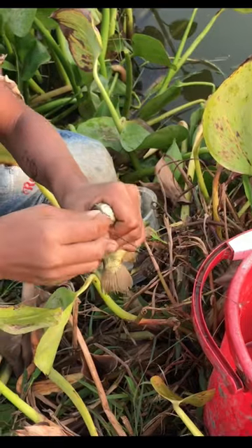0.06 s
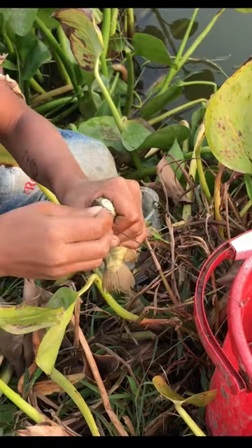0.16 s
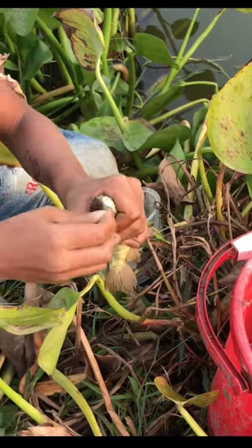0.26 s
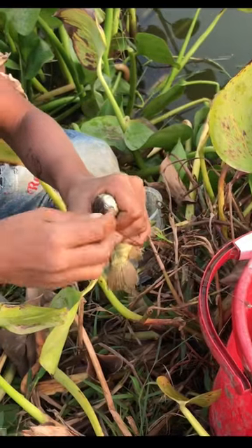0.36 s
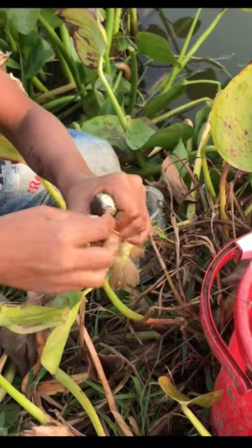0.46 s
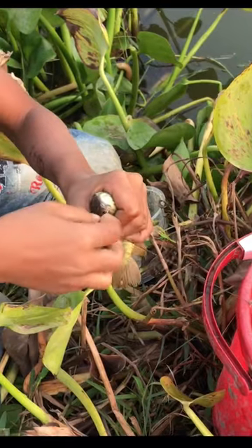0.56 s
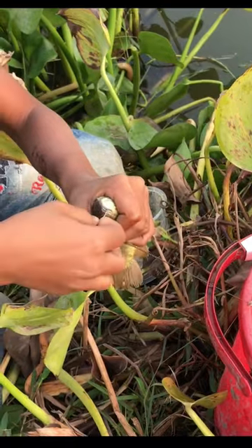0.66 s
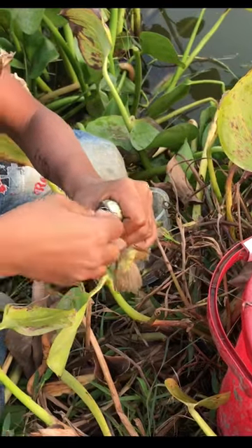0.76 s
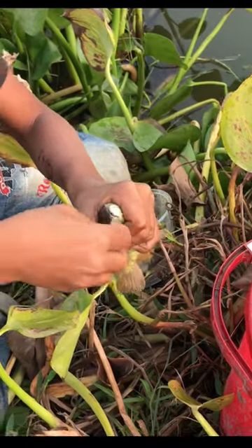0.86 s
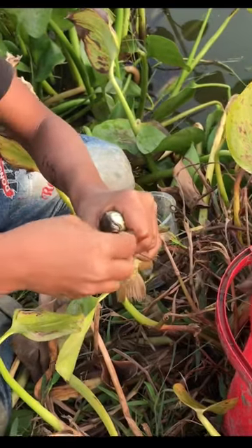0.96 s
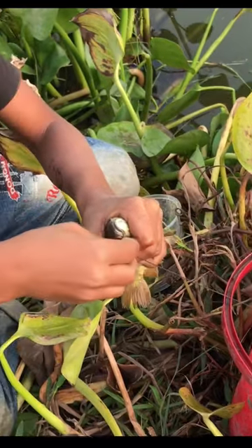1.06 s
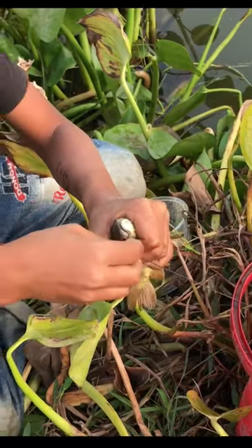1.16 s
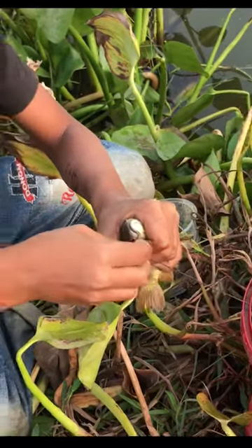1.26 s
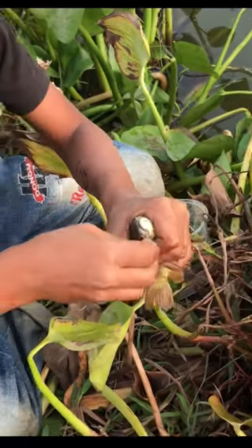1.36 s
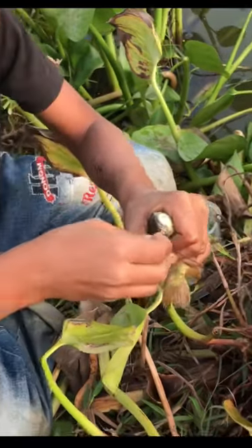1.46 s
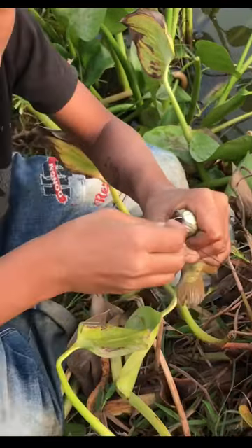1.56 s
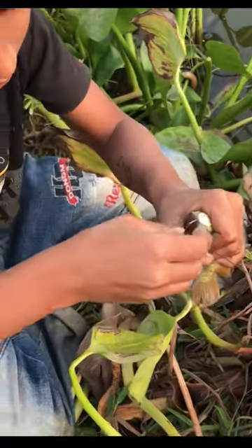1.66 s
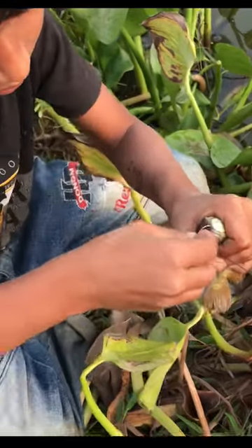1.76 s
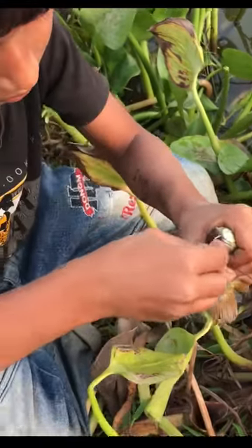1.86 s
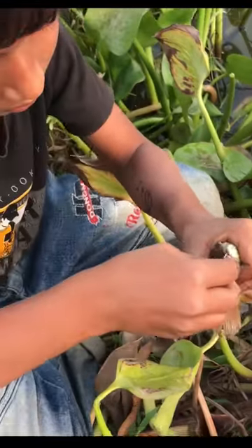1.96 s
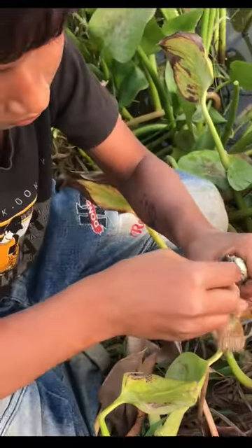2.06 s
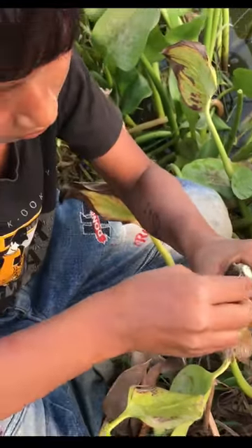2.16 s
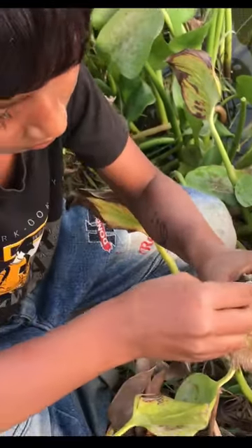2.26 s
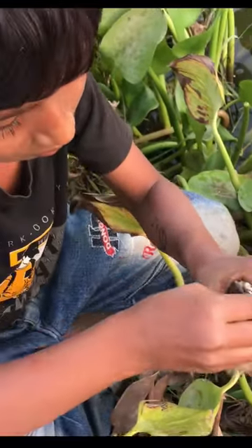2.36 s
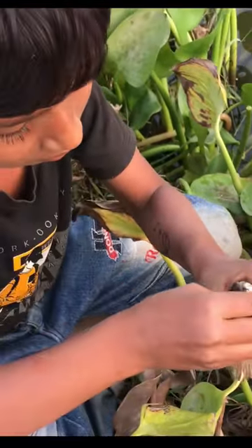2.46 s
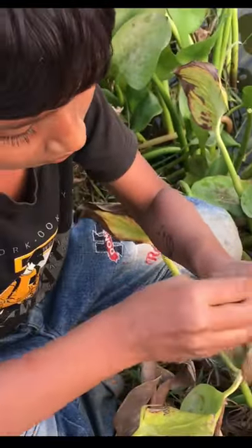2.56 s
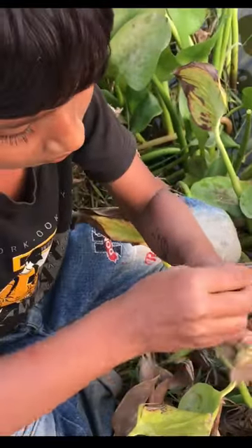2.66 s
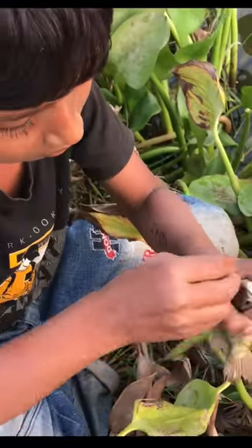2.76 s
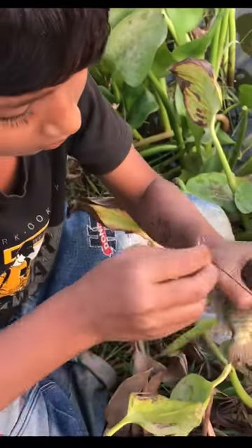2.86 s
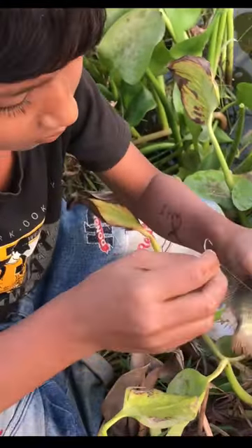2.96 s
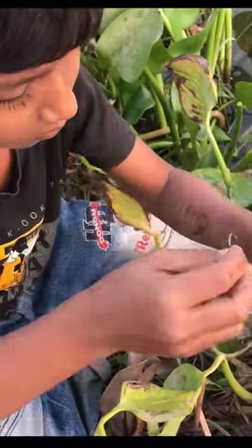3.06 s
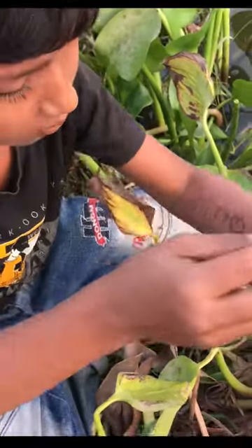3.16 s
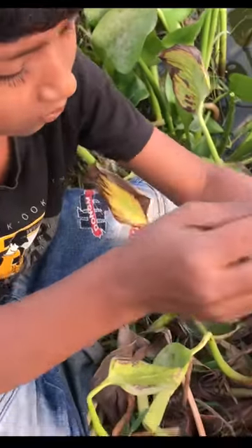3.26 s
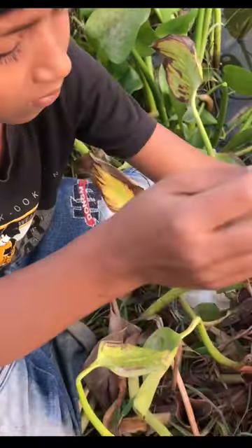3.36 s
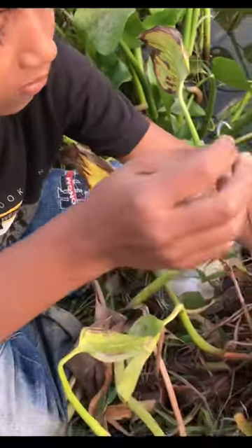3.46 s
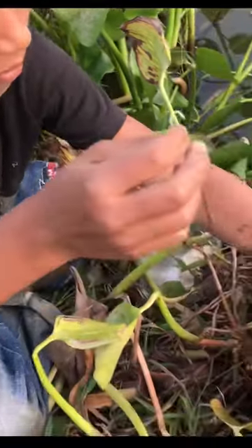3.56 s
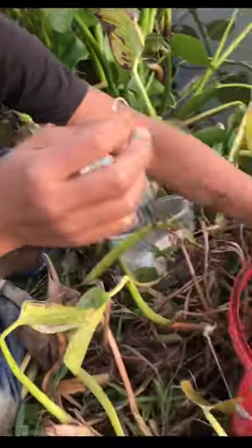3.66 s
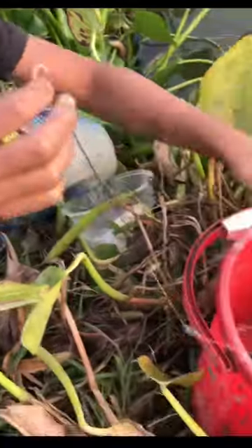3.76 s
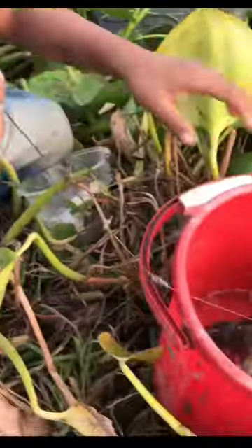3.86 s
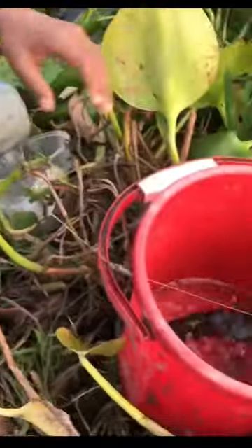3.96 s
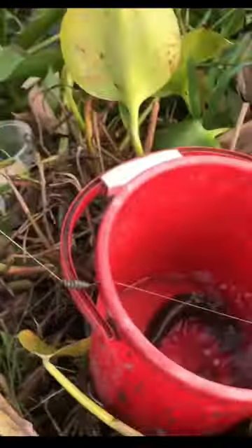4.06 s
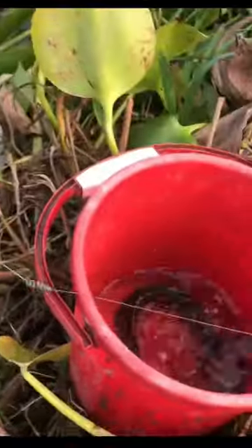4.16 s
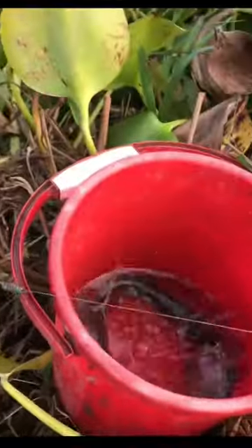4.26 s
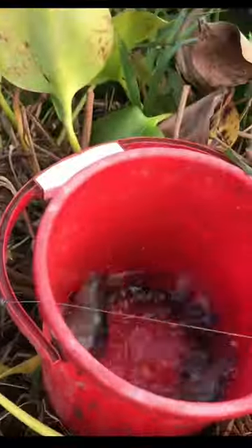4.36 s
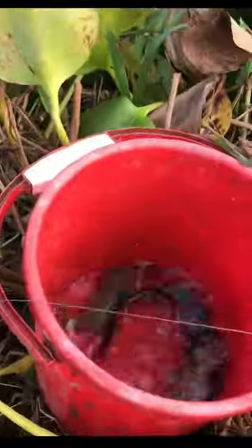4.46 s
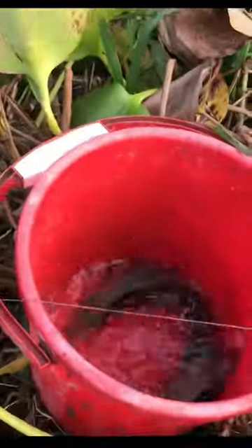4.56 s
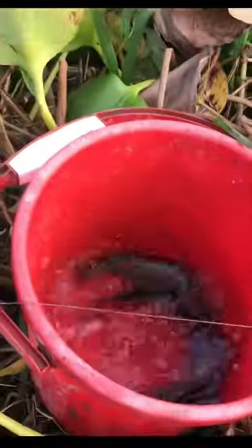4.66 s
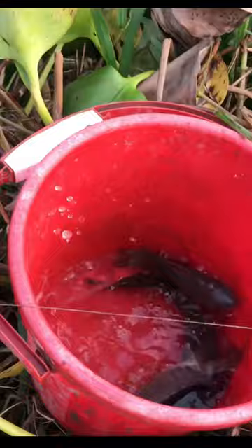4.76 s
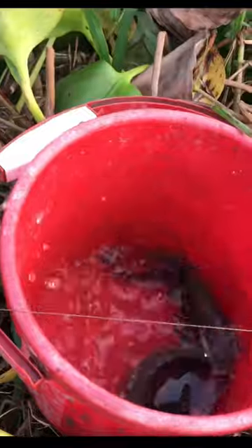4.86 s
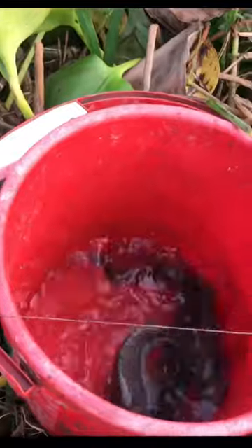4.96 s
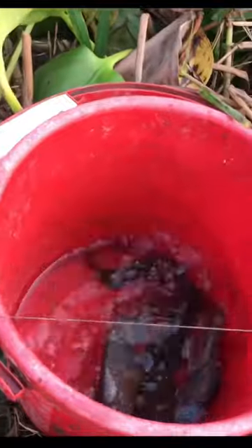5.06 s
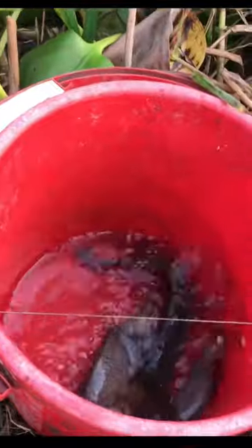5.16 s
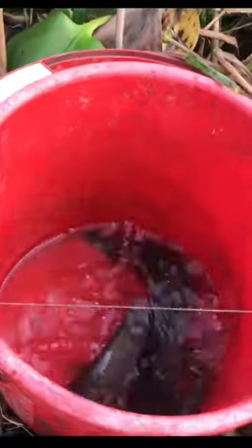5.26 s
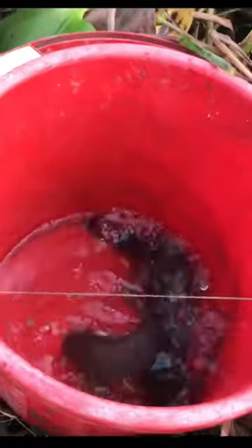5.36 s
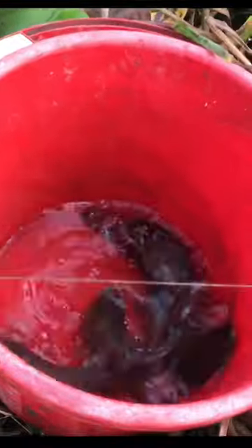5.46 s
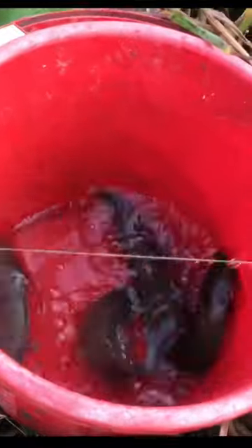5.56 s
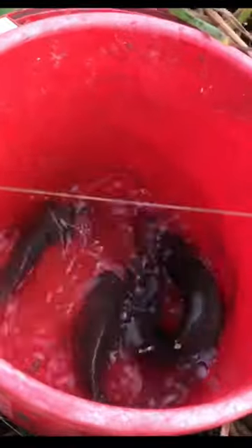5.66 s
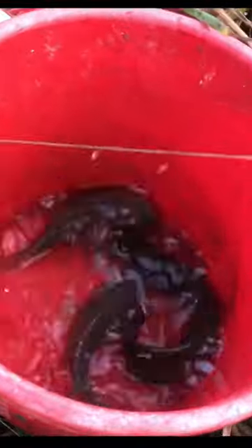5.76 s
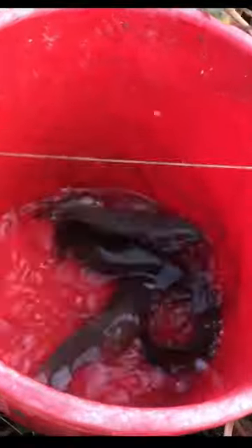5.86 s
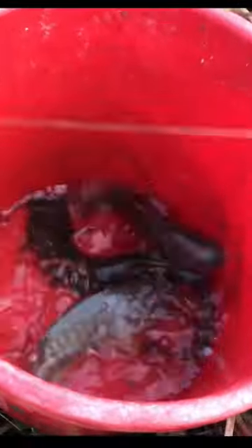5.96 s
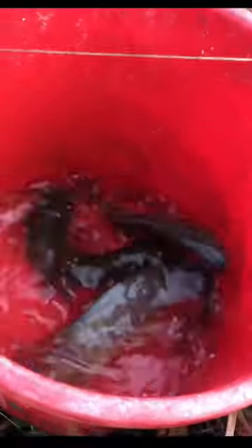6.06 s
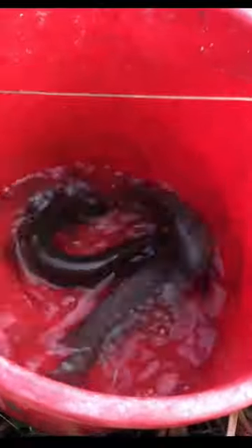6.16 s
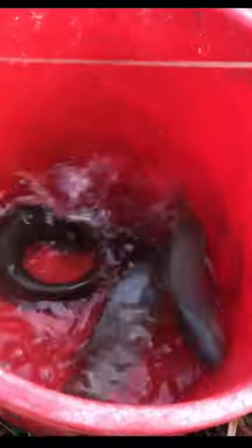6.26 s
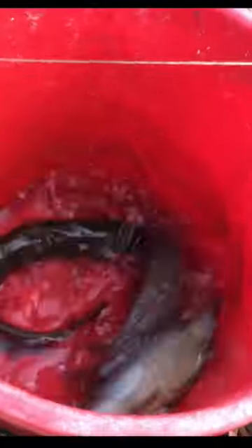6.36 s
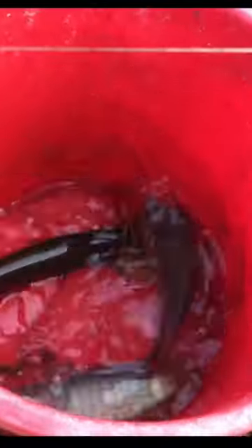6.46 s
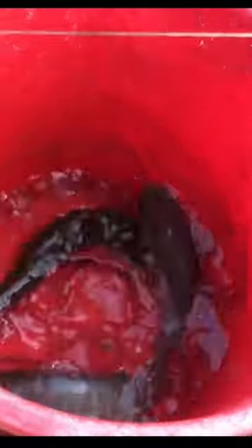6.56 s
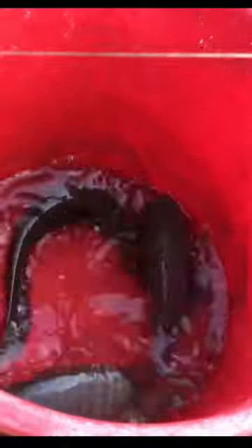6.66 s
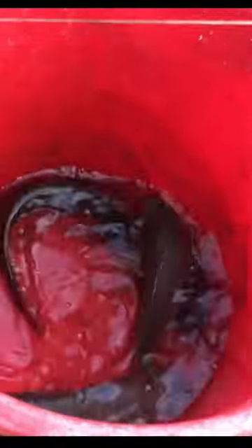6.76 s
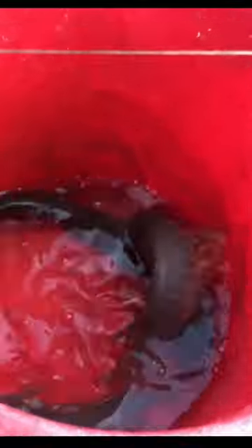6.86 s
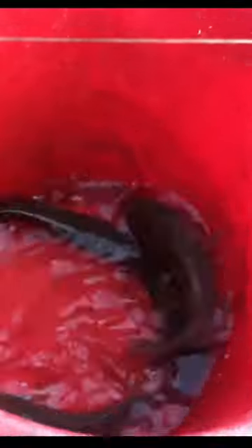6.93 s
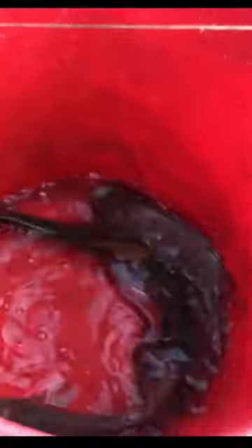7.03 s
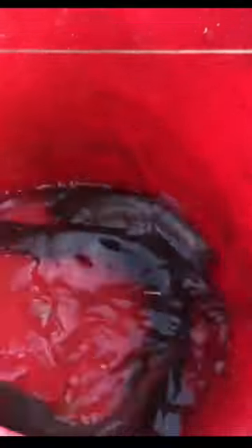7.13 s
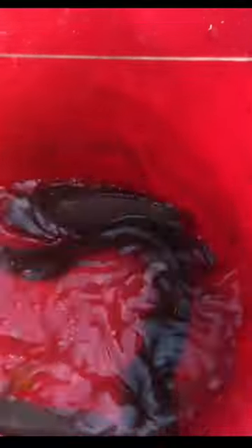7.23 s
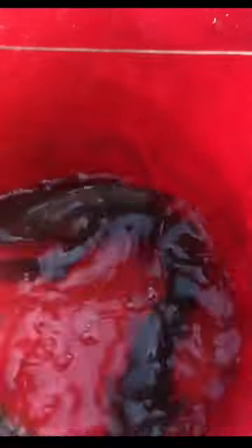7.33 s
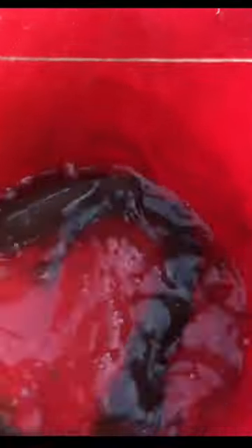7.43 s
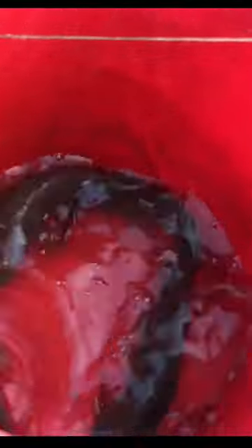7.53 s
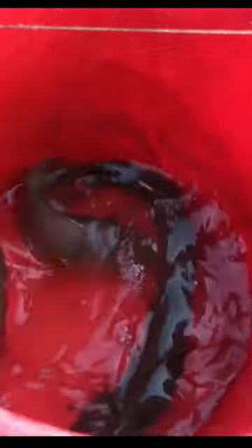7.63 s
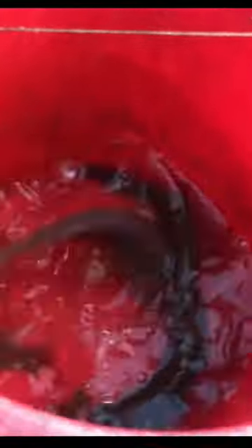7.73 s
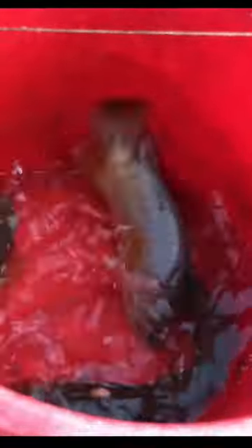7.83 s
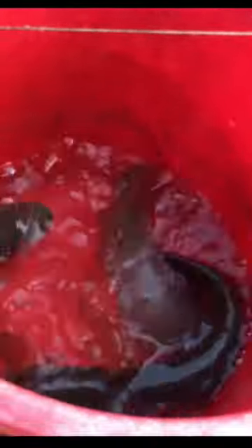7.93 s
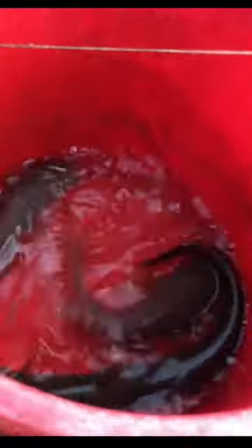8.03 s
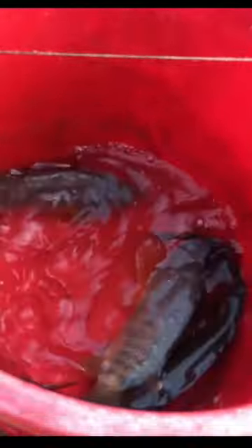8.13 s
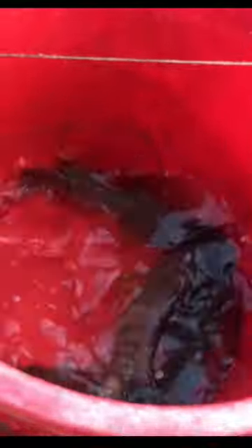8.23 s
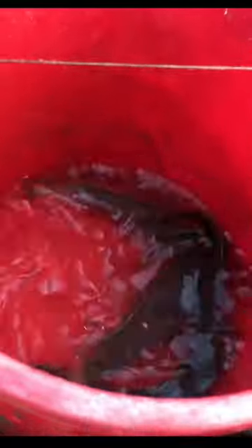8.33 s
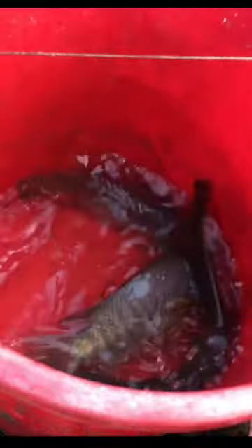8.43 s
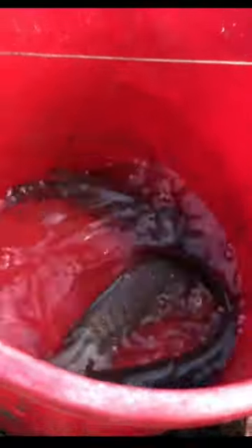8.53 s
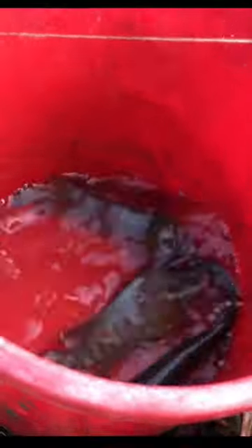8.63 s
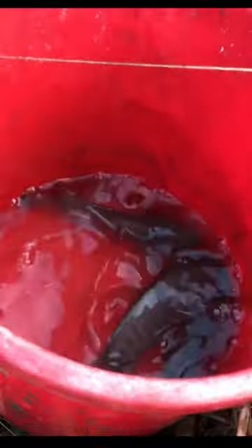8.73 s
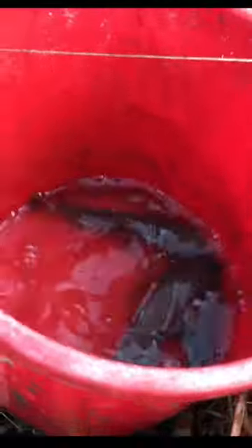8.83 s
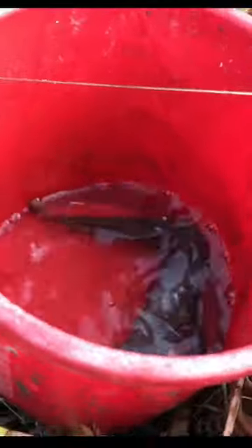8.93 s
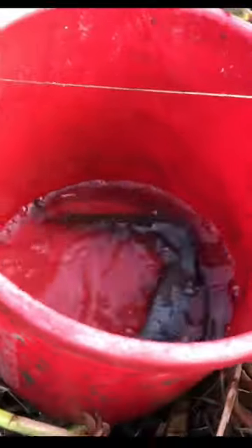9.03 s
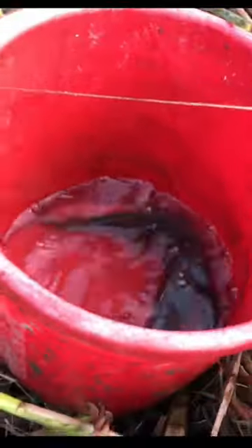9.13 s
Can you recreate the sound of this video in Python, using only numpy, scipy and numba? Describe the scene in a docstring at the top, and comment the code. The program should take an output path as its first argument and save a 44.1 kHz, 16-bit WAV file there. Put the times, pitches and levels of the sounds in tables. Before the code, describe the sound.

Dry clicks and faint rustling, then wet slaps and thrashing splashes in a plastic bucket while a distant engine drones outdoors.

```python
"""Clicks and dry rustling as the catch is handled, then tails slap and thrash in a shallow plastic bucket.
By the pond, far off, an engine gains speed, shifts gear and pulls again over a quiet floor, heard by a phone.
Clicks and slaps are shaped bursts of noise with a ringing tone; spray and droplets are short damped sines.
Large bubbles are gliding sines, and resonant filters make the air in the bucket ring.
The engine is a stack of sines at multiples of its firing rate; the open air is filtered noise."""
import sys
import numpy as np
from scipy import signal
from scipy.fft import rfft, irfft
from scipy.io import wavfile
from scipy.ndimage import uniform_filter1d
from numba import njit

SR = 44100
rng = np.random.default_rng(int(sys.argv[2]) if len(sys.argv) > 2 else 0)


def generate_wav(signal):
    """Clip the signal to [-1, 1] and save it as 16-bit WAV at the path in sys.argv[1]."""
    frames = np.transpose(np.atleast_2d(signal))
    scaled = np.clip(frames, -1, 1) * 32767
    pcm = np.round(scaled).astype(np.int16)
    wavfile.write(sys.argv[1], SR, pcm)


N = 405262  # length in samples

# Colour of the open air. Each row: frequency in Hz, relative level in dB per Hz.
AIR_COLOUR = [(15, -35.5), (25, 1.5), (59, -2.5), (92, -3.5), (270, -17), (394, -27), (451, -28.5),
              (1100, -34.5), (1290, -38.5), (1650, -34), (5000, -39), (9320, -43.5), (10400, -44.5),
              (12200, -35.5), (16000, -48.5)]
# Tyre and exhaust hiss of the road. Each row: time in seconds, level in dB.
ROAD_LEVEL = [(0, -58.5), (1.9, -64), (3.6, -69), (7.001, -70), (9.19, -72.5)]
# Faint far-off calls. Each row: start in seconds, length in seconds, start, middle and end pitch in Hz,
# level in dB.
FAR_CALLS = [(0.27, 0.13, 1487, 1460, 1440, -64), (2.1, .3, 1440, 1490, 1480, -77),
             (1.685, 0.2, 1050, 1125, 1024, -58), (2.127, .09, 706, 727, 725, -62),
             (2.523, 0.072, 745, 730, 740, -65), (3.56, 0.25, 596, 614, 610, -58)]
# The engine in each gear. Each row: time in seconds, firing rate in Hz, level in dB.
FIRST_GEAR = [(0.0, 25.67, -34.5), (0.18, 25.7, -37), (2.26, 27.06, -43.5), (4.6, 28.64, -47),
              (6.38, 29.66, -47), (6.97, 29.9, -50.5), (7.25, 27.6, -74)]
SECOND_GEAR = [(8.1, 21.79, -45), (8.648, 30.62, -39.5), (9.19, 34.17, -42.5)]
# Tones that make up one engine thump. Each row: multiple of the firing rate, relative level in dB.
FIRST_GEAR_ORDERS = [(1, -34.5), (2, -8), (3, -27), (4, -6), (5, 0.5), (6, -10), (7, -12), (8, -18),
                     (9, -19), (10, -24), (11, -25), (12, -33)]
SECOND_GEAR_ORDERS = [(1, -30), (2, -1), (3, -4.5), (4, -15.5), (5, -21.5), (6, -25)]
# Dull knocks nearby. Each row: start in seconds, level in dB, pitch in Hz.
KNOCKS = [(1.185, -16.5, 384), (2.117, -23, 274), (2.247, -22.5, 794)]
# Open-air noise ringing in the bucket. Each row: time in seconds, level in dB.
MURMUR_LEVEL = [(0, -86), (4, -98), (5.998, -101.5), (9.19, -64)]
# Faint treble fizz. Each row: time in seconds, level in dB.
FIZZ_LEVEL = [(0, -108), (3.6, -75), (9.19, -70.5)]
# Dry rustling while the catch is handled. Each row: start in seconds, length in seconds, level in dB.
RUSTLES = [(2.861, .09, -52), (2.965, 0.022, -56), (3.06, 0.17, -54.5), (3.242, 0.046, -71),
           (3.455, 0.071, -62)]
# Bodies bumping the wall and floor of the bucket. Each row: start in seconds, relative level in dB.
THUMPS = [(3.667, -35.5), (3.712, -35.5), (3.893, -47), (3.981, -33.5), (4.047, -32), (4.254, -28.5),
          (4.323, -34), (4.427, -31), (4.578, -36), (4.715, -37), (4.788, -39.5), (4.901, -39),
          (5.005, -32), (5.062, -41), (5.239, -29.5), (5.306, -32), (5.519, -31), (5.677, -33),
          (5.759, -34), (6.218, -44), (6.313, -26), (6.395, -49), (6.597, -36), (6.836, -37),
          (6.929, -43.5), (7.084, -33.5), (7.393, -38.5), (7.595, -46), (7.654, -25), (7.767, -39),
          (7.901, -55), (8.06, -33), (8.151, -53), (8.247, -35.5)]
# Churning water. Each row: time in seconds, relative level in dB.
CHURN_LEVEL = [(2.75, -86), (2.93, -84), (3.05, -81), (3.27, -66.5), (3.52, -84), (3.72, -48), (3.84, -45),
               (4.2, -51), (4.6, -37), (4.71, -37), (4.85, -50), (5.06, -54.5), (5.4, -48.5), (5.67, -43),
               (5.82, -48), (6.1, -60), (6.25, -46), (6.75, -61), (7.45, -61.5), (7.68, -56), (7.81, -46.5),
               (8.04, -55.5), (8.16, -45.5), (8.3, -59), (8.43, -41.5), (8.55, -62.5), (9.19, -70)]
# Large bubbles. Each row: start in seconds, level in dB, start pitch in Hz, end pitch in Hz,
# length in seconds, time to swell in seconds.
BUBBLES = [(3.833, -29.5, 610, 1320, 0.033, 0.00086), (3.899, -27, 1050, 2160, 0.073, 0.00067),
           (4.046, -35.5, 498, 640, 0.073, 0.0025), (4.065, -51, 614, 1470, 0.085, 0.004),
           (4.279, -31, 1500, 2100, 0.027, 0.0023), (4.425, -50, 500, 800, 0.011, 0.001),
           (4.85, -27, 2640, 3750, 0.0093, 0.0022), (5.418, -25.5, 2700, 3360, 0.018, 0.0015),
           (6.233, -33, 1590, 2500, 0.021, 0.002), (6.392, -15, 1910, 2640, 0.022, 0.001),
           (7.744, -30, 3230, 2910, 0.019, 0.0015), (7.786, -37, 1780, 1850, 0.018, 0.0022),
           (4.744, -19, 985, 2780, 0.019, 0.0012), (5.426, -30, 1760, 1920, 0.063, 0.0012),
           (8.08, -26, 1510, 1950, 0.018, 0.0009), (8.26, -24, 2900, 6900, 0.018, 0.0014),
           (8.742, -8.5, 1700, 5130, 0.017, 0.009)]
# Clicks and flicks while the catch is handled (before 3.6 s), then slaps and drops in water.
# Each row: time in seconds, level of the loudest part in dB, ringing pitch in Hz,
# brightness in dB (treble part over low part), length in milliseconds (sets how drawn out it is).
CLICKS_AND_SLAPS = [(1.6015, -40.5, 1040, 24, 2.8), (2.425, -45, 9200, 26, 2.8),
                    (2.507, -40, 8100, 20, 2.7), (2.57, -41, 4460, 34, 3.2), (2.6585, -39.5, 2960, -4, 5.6),
                    (2.858, -48, 1210, -5, 6.4), (2.9203, -35, 1200, -17, 8.9),
                    (2.969, -48, 2170, -23, 7.4), (3.0242, -24, 1230, -12, 9.7),
                    (3.0327, -29.5, 2950, -24, 6), (3.0685, -42, 1250, -26, 3.5),
                    (3.1, -36, 1220, -30, 6.9), (3.1203, -30, 1245, -34, 5.1), (3.1334, -42, 2830, 1, 4.6),
                    (3.1435, -54, 2900, -8, 3.4), (3.1641, -28.5, 2840, -27, 3), (3.189, -48, 4500, 6, 9.6),
                    (3.2006, -29.5, 2830, 2, 4.8), (3.249, -42, 8400, 32, 1.8),
                    (3.342, -44.5, 2220, 21, 6.5), (3.4755, -41, 2870, 5, 5.4),
                    (3.4973, -37.5, 5900, 20, 3.9), (3.5208, -45, 2450, -1, 3.8),
                    (3.573, -40.5, 8900, 21, 2.5), (3.6676, -17, 9040, 14.5, 3.4),
                    (3.6811, -21.5, 5600, 26, 7.5), (3.6918, -22.5, 5970, 12, 6),
                    (3.7117, -40, 5940, -5, 13), (3.7887, -25, 8500, 10, 5.8), (3.8125, -26.5, 4040, 21, 9),
                    (3.854, -37, 3015, 9, 8.5), (3.87, -25, 3100, 35, 6.8), (3.9791, -24.5, 4700, 9, 11),
                    (3.9858, -31, 5700, -4, 5.2), (4.0242, -35, 1190, -25, 9.7),
                    (4.0468, -26.5, 3680, 25, 2.55), (4.1056, -22.5, 7500, 34, 3.7),
                    (4.1736, -24, 3560, 5, 6.2), (4.2041, -23, 3480, 4, 2.2), (4.2505, -14, 2680, -12, 4.2),
                    (4.2551, -20.5, 3340, 10, 5.5), (4.2703, -18, 3380, 5, 4.2),
                    (4.3013, -24.5, 1150, 2, 3.7), (4.3579, -26.5, 1270, -1, 6.4),
                    (4.3895, -35, 1230, -20, 6.2), (4.4134, -29, 3520, 27, 7.4),
                    (4.4217, -40, 3600, -3, 6.7), (4.4606, -24.5, 1090, 5, 4.7), (4.4907, -28, 1150, 5, 11),
                    (4.5186, -41, 1310, -3, 6), (4.5347, -26, 3300, 10, 5), (4.5614, -23.5, 1260, -2, 10.6),
                    (4.5742, -23, 2680, 3, 9.4), (4.6044, -19.5, 5750, 13, 5.7),
                    (4.6347, -16, 2330, 10.5, 7.2), (4.6432, -24.5, 6030, 14, 11.2),
                    (4.6638, -22, 1920, 2, 2.6), (4.6932, -18.5, 5370, 14, 3.1),
                    (4.7094, -14, 4130, -1, 8.6), (4.7347, -11.5, 5400, -22, 1.66),
                    (4.787, -31.5, 1200, -15, 10.6), (4.8037, -25.5, 6000, 24, 1.6),
                    (4.8542, -24.5, 3230, 0, 6.1), (4.92, -30.5, 3830, 14, 6.2),
                    (5.0032, -29, 1120, -18, 7.9), (5.0651, -18.5, 4370, 2, 5.9),
                    (5.0747, -18, 1177, 4, 4.2), (5.107, -24.5, 1540, 0, 3), (5.1529, -20, 1190, 10.5, 8.3),
                    (5.1945, -31.5, 2850, -2, 9.4), (5.2378, -12.5, 1860, -14.5, 6.1),
                    (5.2663, -21, 3850, 35, 8.2), (5.281, -22.5, 7200, 33, 2.6),
                    (5.3026, -19.5, 1140, -35, 9.4), (5.3444, -27.5, 2420, -41, 6.2),
                    (5.3738, -26, 1210, -50, 2.3), (5.4057, -26, 1180, 16, 6.2),
                    (5.4804, -20, 5750, 6, 7.6), (5.493, -18, 1890, -3, 5.8),
                    (5.5018, -18, 6630, 6.5, 11.2), (5.5199, -18.5, 1140, 0, 11),
                    (5.5288, -17, 1820, -4, 10.5), (5.5375, -21, 8450, 11, 8.6),
                    (5.563, -14.5, 6200, 18, 4.4), (5.6065, -29, 6940, 9, 5.7),
                    (5.6349, -25, 3500, 25, 5.4), (5.668, -36.5, 1007, -25, 11),
                    (5.6881, -19, 3180, 26, 3.76), (5.7305, -32.5, 7160, 4, 1.4),
                    (5.7546, -26.5, 1160, -31, 7.1), (5.772, -16, 9200, 17, 2.3),
                    (5.7989, -23, 3480, -18, 9), (5.8538, -27.5, 1680, 5, 7.2),
                    (5.8626, -15, 1270, -20, 6.5), (5.8883, -26, 4270, 31, 3.5),
                    (6.0066, -28.5, 5080, 14, 9.8), (6.014, -29, 1780, -3, 7), (6.0395, -30, 3394, 10, 3.2),
                    (6.0688, -22, 6430, 32, 1.8), (6.1115, -31.5, 5460, 9, 3.9),
                    (6.1248, -30, 8900, 13, 1.5), (6.1722, -33.5, 1500, -33, 2.6),
                    (6.2596, -27.5, 1663, -6, 9.8), (6.2695, -19, 3580, -7, 2.9),
                    (6.2865, -21, 1880, 3, 5.2), (6.2771, -25, 3700, 0, 3.9), (6.2985, -8, 1640, -8.5, 4.7),
                    (6.3094, -8.5, 6230, 2, 4.6), (6.322, -3, 1154, 6.5, 2.14),
                    (6.3558, -18.5, 5420, 11, 4.1), (6.394, -12, 2110, 7, 2.65),
                    (6.4181, -18, 2020, 4.5, 3.6), (6.4425, -29, 1870, -8, 4.2),
                    (6.494, -34.5, 2300, 0, 9.8), (6.5027, -31, 6650, 12, 5),
                    (6.5771, -29.5, 1270, -17, 10), (6.5979, -33, 842, -31, 4.7),
                    (6.676, -36.5, 2670, 0, 1.7), (6.7242, -31.5, 3100, -4, 3.1),
                    (6.8358, -21, 1600, 6, 1.36), (6.8551, -30, 3670, 20, 3), (6.8829, -35, 2860, -2, 4.2),
                    (6.91, -34.5, 4070, -3, 3.8), (6.9781, -30, 4970, 19, 4.1), (7.006, -34, 5550, 11, 4.8),
                    (7.042, -34, 1897, 22, 6.4), (7.0522, -22, 1170, -28, 2.8),
                    (7.0706, -18.5, 1280, 11, 5.2), (7.1762, -28.5, 1245, -17, 7),
                    (7.2076, -33, 2330, -10, 2.7), (7.233, -21, 6800, 16, 2.6),
                    (7.3607, -26.5, 2320, 4, 3.9), (7.3934, -20.5, 1255, -42, 5.6),
                    (7.411, -35, 6840, 23, 2.1), (7.4268, -32, 1210, 20, 1.6),
                    (7.4896, -32, 1280, -17, 4.6), (7.6341, -24.5, 6700, 24, 29),
                    (7.6422, -28, 1050, -22, 4.8), (7.6544, -25, 2050, 11, 3),
                    (7.6829, -23, 1170, -48, 4.2), (7.6925, -17.5, 5450, -28, 2.25),
                    (7.7121, -20.5, 8600, 37, 2.8), (7.7207, -18.5, 6270, 41, 6.4),
                    (7.7255, -27, 5600, 30, 2.6), (7.731, -21, 7200, 20, 9.9), (7.744, -26, 2900, 10, 6.5),
                    (7.77, -26, 1140, -26, 5.4), (7.8191, -22.5, 1170, 0, 11.3),
                    (7.8397, -27.5, 5610, 5, 3.8), (7.9053, -10.5, 1210, 8.5, 6.3),
                    (7.9219, -17, 2780, 24, 4.1), (8.0196, -23, 2280, 5, 5.4), (8.0512, -26, 2250, 2, 5),
                    (8.0904, -11.5, 9050, 31, 2.03), (8.1127, -39, 8280, -9, 6.7),
                    (8.1212, -24, 8350, 23, 2.3), (8.1396, -15.5, 3540, 36, 6.3),
                    (8.1488, -23.5, 3400, -14, 4.9), (8.1642, -16, 1880, -13, 4.5),
                    (8.2301, -7.5, 6200, 65, 2.8), (8.2382, -13.5, 3850, -3, 1.8),
                    (8.2487, -26, 1230, -31, 13.5), (8.2934, -34, 3260, -4, 3.4),
                    (8.3612, -29, 5670, 18, 2.7), (8.3906, -27, 3800, 23, 8.7),
                    (8.4069, -22.5, 2800, 19, 15.6), (8.4243, -31, 3180, -16, 8.8),
                    (8.4467, -30, 2510, -11, 8.5), (8.4632, -25, 4300, 10, 6.4),
                    (8.4749, -30, 3700, 17, 5.9), (8.552, -35.5, 3780, 10, 2.85),
                    (8.6195, -32.5, 1500, 49, 2.9), (8.8752, -43, 8200, 35.5, 4.3),
                    (8.954, -43.5, 7400, 23, 2.5)]
# The low plop, crack and treble spit of a plain click or slap. Each row: lowest Hz, highest Hz,
# rise in seconds, time to die away by 60 dB in seconds.
PARTS = [(883, 2730, 0.001034, 0.023), (1980, 6640, 0.000908, 0.022), (6360, 15500, 0.00042, 0.018)]
# Ringing air in the bucket. Each row: pitch in Hz, relative level in dB, time to die by 60 dB in seconds.
BUCKET_MODES = [(387.3, 5, 0.061), (1172, -8, 0.032), (1740, -12, 0.028), (1920, -23, 0.09),
                (3103, -10, 0.029)]


def undb(db):
    """Turn decibels into a plain gain."""
    return 10 ** (np.asarray(db) / 20)


def unit(x):
    """Scale to an RMS level of one."""
    return x / np.sqrt(np.mean(x ** 2))


def noise():
    """White noise for the whole scene."""
    return rng.standard_normal(N)


def band(x, hz, width):
    """Two-pole band-pass with a gain of one at its centre."""
    return signal.lfilter(*signal.iirpeak(min(hz, .4 * SR), hz / width, fs=SR), x)


def cut(x, hz, kind):
    """Second-order low-pass or high-pass."""
    return signal.sosfilt(signal.butter(2, hz, kind, fs=SR, output="sos"), x)


def fade(t, t60):
    """Exponential decay that loses 60 dB in t60."""
    return np.exp(-np.log(1000) * t / t60)


def walk(rate):
    """Random levels, each held for 1 / rate seconds and smoothed twice; their spread is near one."""
    hold = int(SR / rate)
    steps = np.repeat(rng.standard_normal(N // hold + 1), hold)
    return 1.48 * uniform_filter1d(uniform_filter1d(steps, hold), hold)[:N]


def add(out, s, x):
    """Mix a sound into out, starting at s seconds."""
    i = int(s * SR)
    out[i:i + len(x)] += x[:N - i]


def curve(table):
    """Level in dB at every sample, joined by straight lines."""
    return np.interp(np.arange(N) / SR, *np.transpose(table))


def track(table, off_db):
    """Columns of a curve at every sample, and an offset that falls to off_db outside its span."""
    s, *columns = np.transpose(table)
    t = np.arange(N) / SR
    inside = uniform_filter1d(1. * ((t >= s[0]) & (t <= s[-1])), size=2001, mode="nearest")
    return [np.interp(t, s, c) for c in columns], off_db * (1 - inside)


@njit
def grains(n, start, hz, cycles, glide, size):
    """Drops and small bubbles: damped sines with a soft start whose pitch rises as they die."""
    out = np.zeros(n)
    for k in range(len(start)):
        step, phase, a, hush = 2 * np.pi * hz[k] / SR, 0., size[k], 1.
        length = cycles[k] * SR / hz[k]  # decay time in samples
        for i in range(start[k], min(n, start[k] + int(5 * length))):
            phase += step
            out[i] += a * (1 - hush) * np.sin(phase)
            a *= 1 - 1 / length
            hush *= max(1 - 5 / length, 0.)
            step = min(step * (1 + glide[k] / length), 2.6)  # stay below half the sample rate
    return out


def outdoors():
    """Smooth open-air noise with wandering bass, plus fading road hiss with narrow bands that waver."""
    hz, db = np.transpose(AIR_COLOUR)
    f = np.arange(N // 2 + 1) * SR / N + 1
    colour = undb(np.interp(np.log(f), np.log(hz), db))
    air = undb(-52 + 0.45 * walk(1.8)) * unit(irfft(rfft(noise()) * colour, N))
    rumble = undb(-49 + 4.5 * walk(2.6)) * unit(band(band(noise(), 62, 51), 62, 51))
    road = unit(band(band(noise(), 800, 680), 800, 680) + 0.37 * band(noise(), 230, 200))
    whine = sum(undb(1.9 * walk(6.5)) * unit(band(noise(), hz, 45)) for hz in (620, 930, 1330))
    road_gain = undb(curve(ROAD_LEVEL) + 0.47 * walk(4.0))
    return air + rumble + road_gain * (road + 0.26 * whine)


def far_calls():
    """Soft, unsteady whistles on curved pitch paths with a weak second partial."""
    out = np.zeros(N)
    for s, length, hz0, hz1, hz2, db in FAR_CALLS:
        u = np.linspace(0, 1, int(length * SR))
        bend = 4 * hz1 - 2 * hz0 - 2 * hz2  # leads the pitch through its middle value
        hz = hz0 + (hz2 - hz0) * u + bend * u * (1 - u)
        phase = 2 * np.pi * np.cumsum(hz) / SR
        swell = np.sqrt(np.sin(np.pi * u).clip(0))
        add(out, s, undb(db) * swell * (np.sin(phase) + 0.1 * np.sin(2 * phase)))
    return out * undb(1.8 * walk(44.33))


def engine(gear, orders, lag, waver_db):
    """A single cylinder's thumps: sines at multiples of the firing rate, each wavering, the high ones most."""
    (hz, db), off_db = track(gear, -65)
    phase = 2 * np.pi * np.cumsum(hz * (1 + 0.005 * walk(20))) / SR
    thump = np.zeros(N)
    for k, order_db in orders:
        gain = undb(order_db + waver_db * np.sqrt(k) * walk(9))
        thump += gain * np.sin(k * phase + lag * k * k)  # lag spreads each thump in time
    return np.sqrt(2) * undb(db + off_db) * thump


def knocks():
    """Soft blows: sines that die within a few cycles."""
    out, t = np.zeros(N), np.arange(900) / SR
    for s, db, hz in KNOCKS:
        shape = np.minimum(t / 0.00066, 1) * fade(t, 3.1 / hz)
        add(out, s, undb(db) * np.sin(2 * np.pi * hz * t) * shape)
    return out


def bucket_murmur():
    """Open-air noise rings in the bucket, a narrow band that swells at the end as the phone nears it."""
    return undb(curve(MURMUR_LEVEL)) * unit(band(noise(), 1285, 70))


def fizz():
    """Wavering treble noise that grows as the phone nears the water."""
    return undb(curve(FIZZ_LEVEL) + 5.1 * walk(30)) * unit(band(noise(), 10500, 7000))


def rustles():
    """Ragged bursts of band-passed noise that start quickly and thin out."""
    out = np.zeros(N)
    scratch = unit(undb(4.3 * walk(300)) * cut(band(noise(), 1200, 3800), 4700, "low"))
    for s, length, db in RUSTLES:
        u = np.linspace(0, 1, int(length * SR))
        add(out, s, undb(db) * np.minimum(u * length / 0.0032, 1) * (1 - u ** 3))
    return out * scratch


def churning():
    """Level of the churning in dB at every sample."""
    (db,), off_db = track(CHURN_LEVEL, -52)
    return db + off_db


def churn():
    """Droplets, low gulps, rising chirps, crackle and fine spray over patchy hiss, all led by the churning."""
    shared = walk(45)

    def drops(per_s, lo_hz, hi_hz, cycles, glide, range_db):
        """Random grains; the longer-lived ones glide up more."""
        when, pitch, life, loud = rng.random((int(per_s * N / SR), 4)).T
        start = (when * N).astype(np.int64)
        hz = lo_hz * (hi_hz / lo_hz) ** pitch
        size = undb(range_db * loud ** 2)
        return unit(grains(N, start, hz, cycles * (0.14 + life), glide * life ** 3, size))

    def hiss(hz, width):
        """Noise whose patches are partly shared between bands."""
        return unit(undb(3.1 * shared + 2.8 * walk(240)) * band(noise(), hz, width))

    droplets = drops(300, 1100, 6000, 7, .05, 18)
    crackle = drops(460, 830, 5500, 0.66, .05, 23)
    gulps = drops(40, 420, 1290, 5.3, 0.18, 15)
    chirps = drops(50, 1200, 3800, 11, .2, 14)
    wet = 0.18 * gulps + 0.3 * chirps + 0.68 * droplets + 0.17 * crackle
    wet += .15 * hiss(290, 230) + 0.13 * hiss(1000, 700)
    wet += 0.069 * hiss(1600, 1444) + 0.36 * hiss(2900, 3000)
    spray = 0.68 * cut(hiss(10000, 9000), 5500, "high") + 1.47 * drops(400, 5500, 17200, 5.8, 0.035, 22)
    return undb(churning()) * (wet + undb(-12.5) * spray)


def bubbles():
    """Large bubbles near the surface: a wavering sine swells, then fades as its pitch sweeps and levels off."""
    out, waver = np.zeros(N), undb(5.5 * walk(180))
    bend = 2.5  # how early the sweep levels off
    for s, db, hz0, hz1, length, swell in BUBBLES:
        u = np.linspace(0, 1, int(length * SR))
        shape = np.minimum(u * length / swell, 1) ** 2 * fade(u, 1.7) * np.sqrt(1 - u)
        sweep = (1 - np.exp(-bend * u)) / (1 - np.exp(-bend))
        phase = 2 * np.pi * np.cumsum(hz0 + (hz1 - hz0) * sweep) / SR
        add(out, s, undb(db) * shape * np.sin(phase))
    return out * waver


def thumps(rows):
    """Slow pushes on the bucket, short low sines: the listed bumps and a weak one under each click or slap."""
    out, t = np.zeros(N), np.arange(1800) / SR
    weak = rows[:, [0, 3]] + [0, -23]  # 23 dB under the low part
    pushes = np.vstack([THUMPS, weak])
    for (s, db), pitch in zip(pushes, rng.random(len(pushes))):
        tone = np.sin(2 * np.pi * (320 + 260 * pitch) * t)
        add(out, s, undb(db) * tone * np.minimum(t / 0.00058, 1) * fade(t, 0.009))
    return out


def all_clicks_and_slaps(count=90):
    """Listed ones and small chance ones led by the churning: time, pitch, slowness, dB of plop, crack, spit."""
    usual_ms = 5.4  # length of a plain click or slap
    when, size, pitch, colour, wetness = rng.random((count, 5)).T
    s = CHURN_LEVEL[0][0] + (CHURN_LEVEL[-1][0] - CHURN_LEVEL[0][0] - .1) * when
    db = churning()[(s * SR).astype(int)] + 16 - 1.5 * np.log(size + 0.086)
    small_ms = 2 * usual_ms * (wetness + 0.23)
    small = np.transpose([s, db, 1000 * 7.5 ** pitch, 31 * (2 * colour - 1), small_ms])
    s, db, hz, bright_db, ms = np.vstack([CLICKS_AND_SLAPS, small]).T
    # The crack lies over the mean of plop and spit, more so when the ringing pitch is in its range.
    crack_db = 1.5 + 7.5 * ((hz >= PARTS[0][1]) & (hz < PARTS[1][1]))
    parts = np.array([-bright_db / 2, crack_db, bright_db / 2])
    slow = (np.maximum(ms, 1) / usual_ms) ** 0.55
    return np.vstack([s, hz, slow, db + parts - parts.max(axis=0)]).T


def spatter(rows, count=12):
    """Short rings scatter around and after each click or slap, as droplets do; levels follow it at that pitch."""
    s, _, _, *part_db = rows.T[:, :, None]
    late, pitch, size, life = np.moveaxis(rng.random((len(rows), count, 4)), 2, 0)
    delay = -.016 * np.log(late + 0.027) - .002  # seconds
    hz = 1100 * 10.5 ** pitch
    near_db = np.select([hz < PARTS[0][1], hz < PARTS[1][1]], part_db[:2], part_db[2])
    db = near_db - 4.0 - 14 * size - 300 * np.abs(delay)
    cycles = (2.5 + 5 * life) * np.sqrt(hz / 3000)
    rings = ((s + delay) * SR).astype(np.int64), hz, cycles, 0.046 * life ** 3, undb(db)
    return grains(N, *(np.ravel(r) for r in rings))


def clicks_and_slaps(rows):
    """Handling clicks and tail slaps: low, middle and treble bursts of noise, a ringing tone and a short snap."""
    out, t = np.zeros(N), np.arange(1400) / SR
    bursts_of_all = rng.standard_normal((len(rows), 3, len(t)))
    chance = rng.random((len(rows), 5))
    snap_hz = 2602
    snap = np.sin(2 * np.pi * snap_hz * t[t < 1 / snap_hz])  # one cycle
    ragged = undb(4.26 * walk(600))
    filters = [signal.butter(3, part[:2], "band", fs=SR, output="sos") for part in PARTS]
    for (s, hz, slow, *part_db), bursts, (late, climb, *colours) in zip(rows, bursts_of_all, chance):
        uneven = ragged[int(s * SR):][:len(t)]
        for db, burst, sos, colour, (lo_hz, hi_hz, rise, t60) in zip(part_db, bursts, filters, colours, PARTS):
            rise = rise * slow ** 1.1 * slow  # a longer one swells in more slowly still
            attack = np.minimum(t / rise, 1) ** 2
            dying = undb(-1.0) * fade((t - rise).clip(0), 0.14 * t60)
            dying = dying + fade(t, t60 * slow) + undb(-17.5) * fade(t, 3.8 * t60)
            part = signal.sosfilt(sos, burst * attack * dying * uneven)
            rings = lo_hz <= max(hz, PARTS[0][0]) < hi_hz
            centre = hz if rings else lo_hz * (hi_hz / lo_hz) ** colour ** 1.17
            part = part + 4.9 * band(part, centre, 0.11 * centre)  # a resonance colours the burst
            part = part / np.abs(part).max()
            if rings:
                tone = np.sin(2 * np.pi * hz * t * (1 + 12 * climb ** 2 * t))  # pitch climbs
                part = 1.098 * part + 0.39 * attack * fade(t * hz, 25) * tone
            stagger = .001 * slow * (colour - late)  # the parts do not start quite together
            add(out, s - rise + stagger, undb(db) * part)
        # The snap is stronger the shorter the click or slap.
        add(out, s - 1 / snap_hz, undb(max(part_db[:2]) - 5.5) / slow * snap)
    return out


def bucket(x, thud):
    """The air column (quarter wave and overtones) rings with the sounds and the thuds inside."""
    driven = x + undb(9.5) * thud
    rings = np.zeros(N)
    for hz, db, t60 in BUCKET_MODES:
        rings += undb(db) * band(driven, hz, np.log(1000) / np.pi / t60)  # longer ringing, narrower band
    return x + 2.91 * thud + undb(5.5) * rings


def scene():
    """Mix the far sounds with the handling and thrashing, which ring in the bucket."""
    background = outdoors() + far_calls()
    motor = engine(FIRST_GEAR, FIRST_GEAR_ORDERS, 0.1126, 0.62)
    motor += engine(SECOND_GEAR, SECOND_GEAR_ORDERS, 0.11, 1.0)
    nearby = knocks() + bucket_murmur() + fizz()
    rows = all_clicks_and_slaps()
    catch = rustles() + churn() + bubbles() + spatter(rows) + clicks_and_slaps(rows)
    return (background + motor + nearby + bucket(catch, thumps(rows)))[None]


def record(dry):
    """The phone drops the deepest bass, rounds the loudest peaks and cuts the top."""
    no_bass = cut(cut(dry, 36, "high"), 36, "high")
    rounded = np.tanh(0.7 * no_bass) / 0.97
    return signal.sosfilt(signal.ellip(10, .2, 70, 16400, fs=SR, output="sos"), rounded)


dry = scene()
out = record(dry)
generate_wav(out)
```